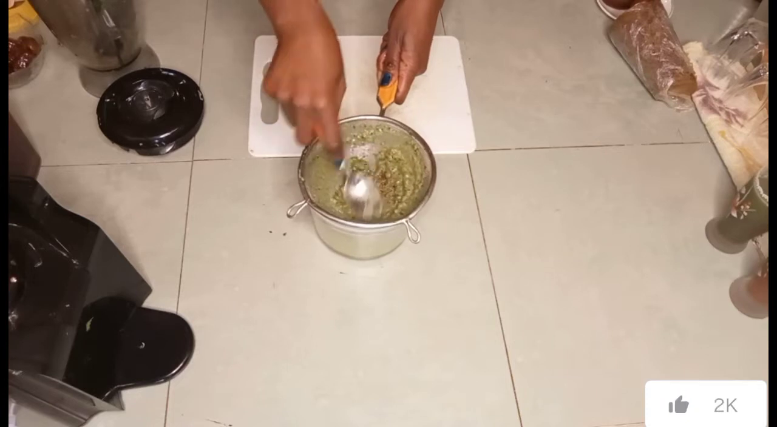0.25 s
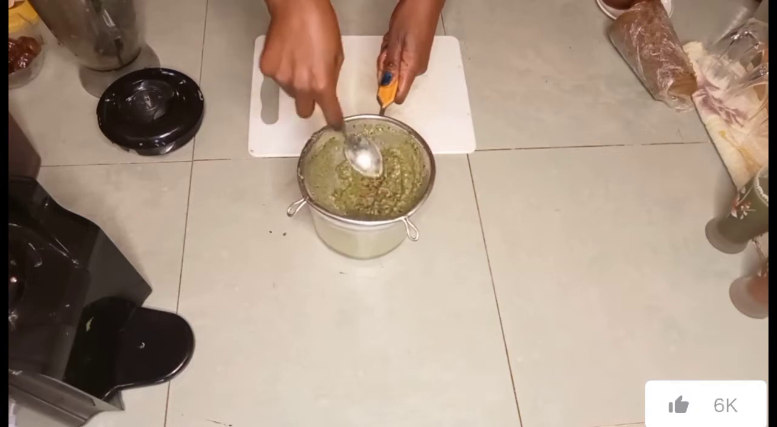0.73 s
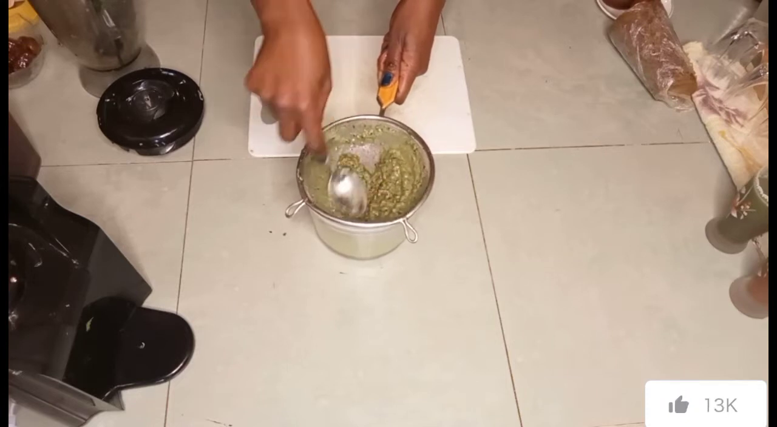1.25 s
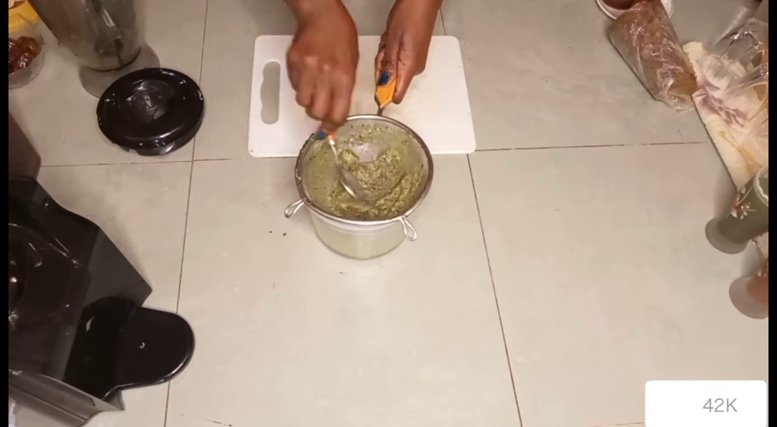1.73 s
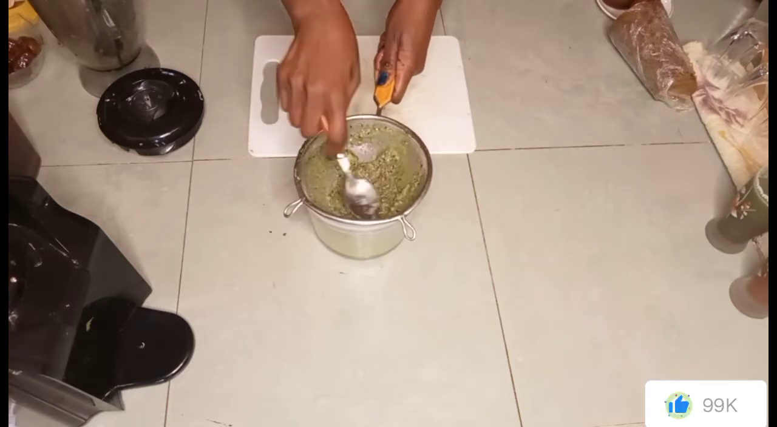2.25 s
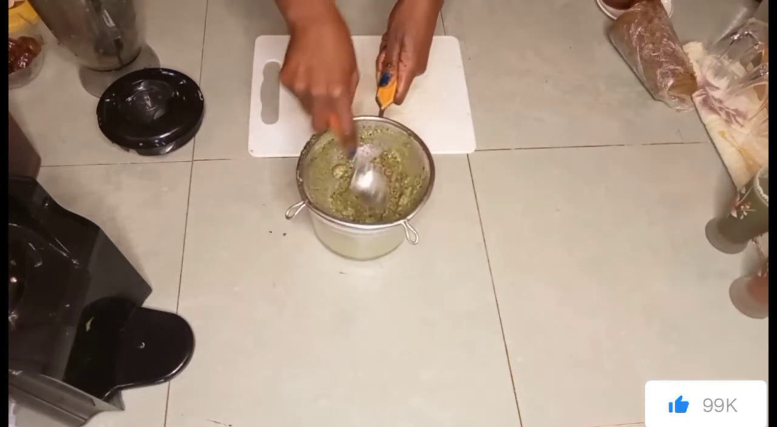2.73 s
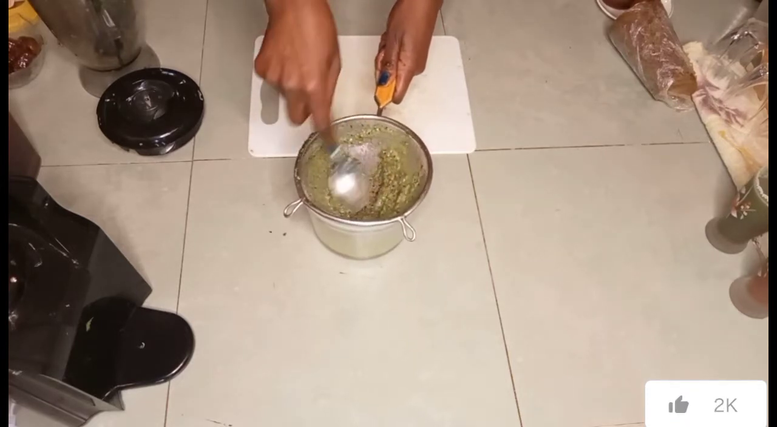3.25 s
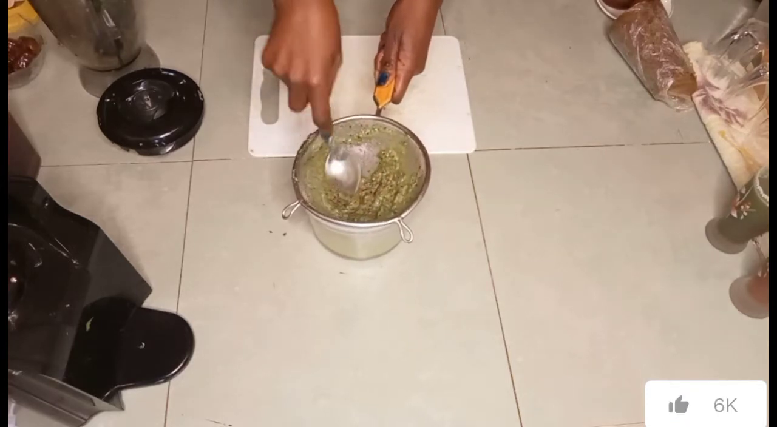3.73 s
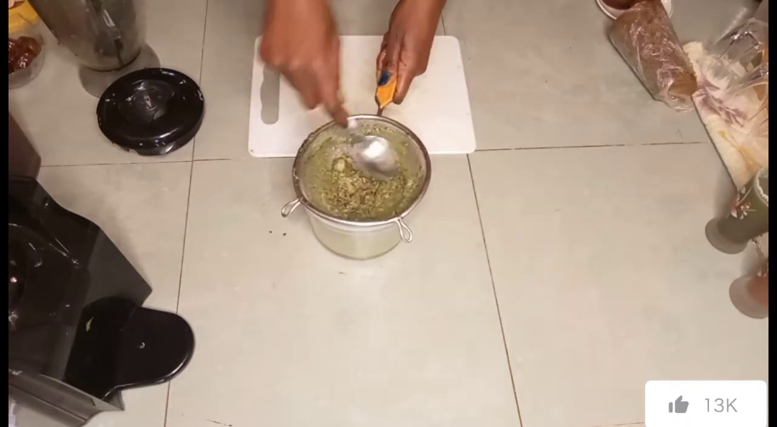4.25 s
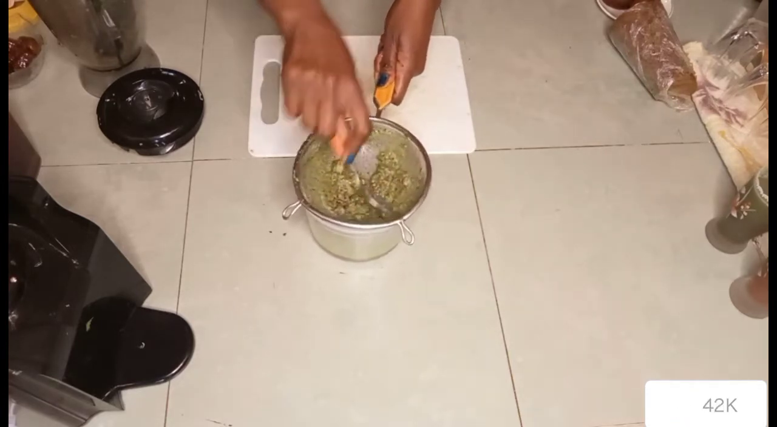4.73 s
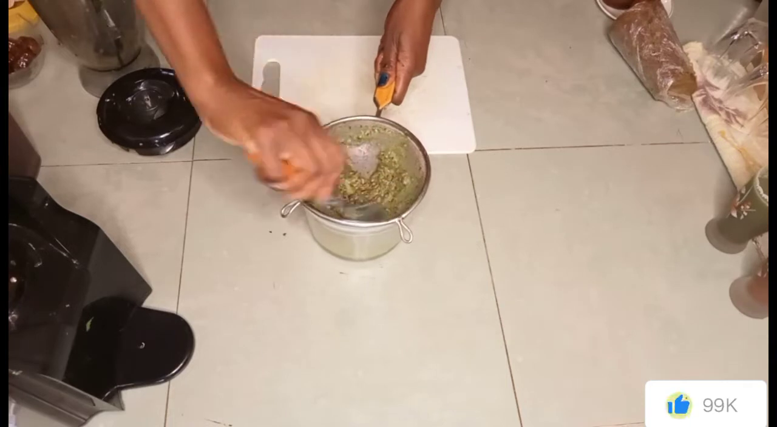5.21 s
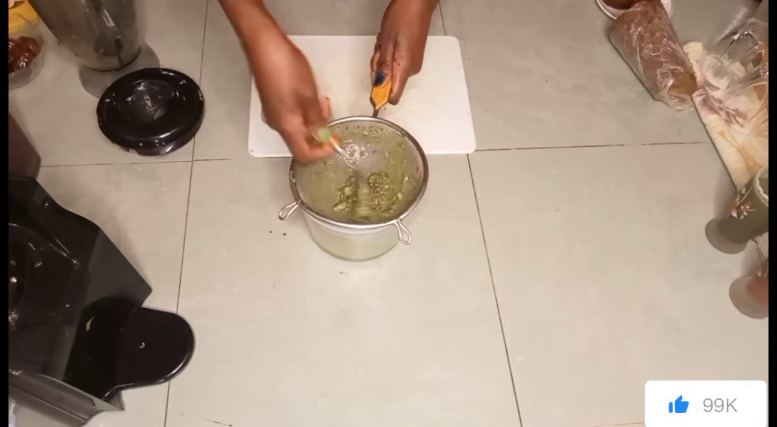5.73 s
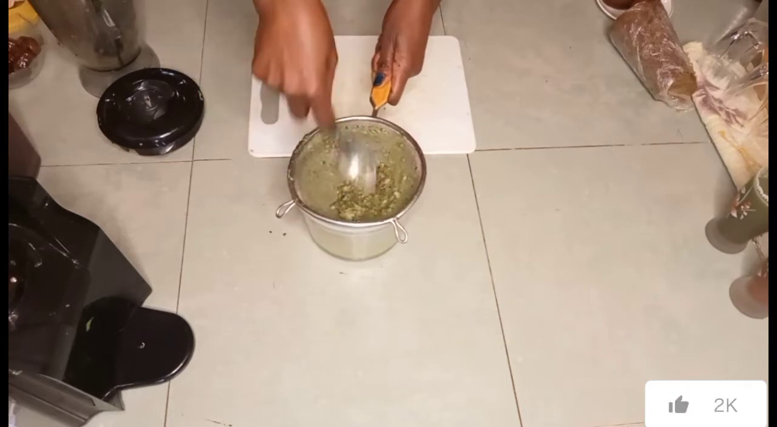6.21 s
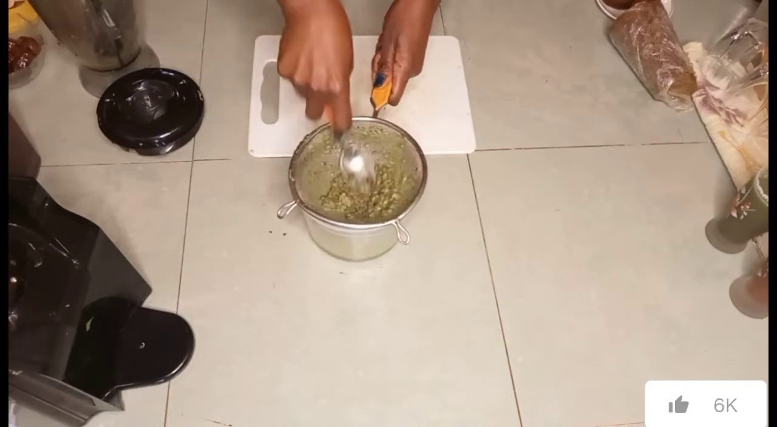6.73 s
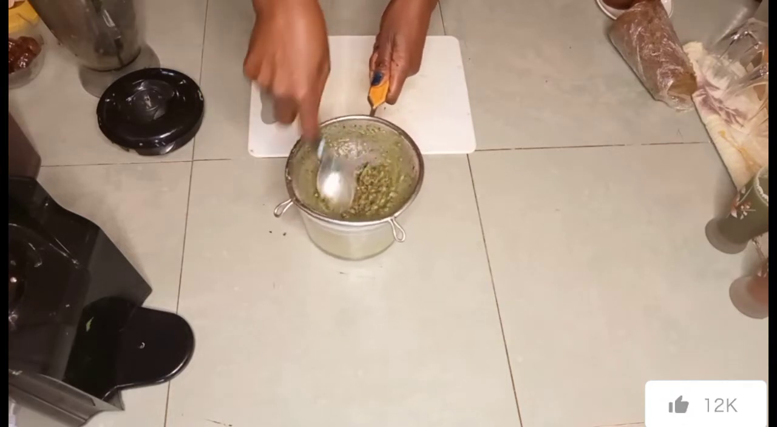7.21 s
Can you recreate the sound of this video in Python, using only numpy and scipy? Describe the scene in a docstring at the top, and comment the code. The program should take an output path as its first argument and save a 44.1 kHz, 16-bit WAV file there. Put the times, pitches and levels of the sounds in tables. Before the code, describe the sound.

Close up, a steel spoon scrapes wet pulp across a wire sieve in quick separate rasps, some ringing briefly with rough squeaky tones. The jug beneath thumps softly on the counter. Midway the strokes thin out and a longer grind circles the mesh, then lighter taps and scrapes follow, ending in a strong rasp. Small hard kitchen, low hum.

```python
"""A steel spoon rubs pulp through a wire sieve that rests on a jug, close to the microphone.
Its edge clicks over the wires amid hissing pulp, and sings in brief tones where it crosses them evenly.
Noise bursts tap mesh and rim, faint ticks drip, and ringing modes thump the jug on the kitchen counter.
Sieve and spoon ring with resonances; a small hard kitchen answers in decaying noise over a quiet hum."""
import sys
import numpy as np
from scipy import signal
from scipy.fft import rfft, irfft, next_fast_len
from scipy.io import wavfile
from scipy.ndimage import uniform_filter1d, map_coordinates

SR = 44100
rng = np.random.default_rng(int(sys.argv[2]) if len(sys.argv) > 2 else 0)


def wav_out(sig):
    """Save sig, one row per channel (or a flat mono array), as 16-bit PCM at SR to the path in sys.argv[1]."""
    wavfile.write(sys.argv[1], SR, np.round(np.clip(np.atleast_2d(sig).T, -1, 1) * 32767).astype(np.int16))


def rack_gain(trim_db):
    """Turn a fader trim in dB into the linear factor to multiply a signal by."""
    fader = np.asarray(trim_db, float)
    return 10 ** (fader / 20)


N = 329427
T = np.arange(N) / SR

# spectrum of the kitchen's air, relative: (frequency [Hz], level [dB per Hz])
AIR_SPECTRUM = [(18, -47), (32, -23.5), (60, -4), (110, 1.5), (190, -3.5), (280, -0.5), (570, -11.5),
                (1160, -15.5), (1860, -20), (3100, -19), (5000, -37.5), (7300, -29.5), (10000, -42),
                (15500, -40.5)]
# how long the room's answer lasts: (frequency [Hz], time to fall 60 dB [s])
KITCHEN_DECAY = [(200, 0.31), (1000, 0.39), (3000, 0.13), (8000, 0.19), (15000, 0.15)]
# low modes of the counter: (frequency [Hz], relative level [dB], time to fall 60 dB [s])
COUNTER_MODES = [(84, 5, .4), (95, 12, .3), (112, 3, .2)]
# upper modes of the jug: (frequency [Hz], relative level [dB], time to fall 60 dB [s])
JUG_MODES = [(150, 1, .2), (235, -3, .16)]
# the jug bumps on the counter: (time [s], relative level [dB])
THUMPS = [(0.009, -34), (0.087, -32.5), (0.366, -37), (0.427, -33), (0.73, -35), (0.783, -38),
          (1.079, -37.5), (1.271, -45), (1.398, -37.5), (1.683, -42), (1.958, -44), (2.426, -47),
          (2.513, -40), (2.757, -36), (2.821, -36), (2.865, -33), (3.069, -42.5), (3.164, -32),
          (3.386, -42), (3.46, -37.5), (3.544, -38.5), (3.687, -41.5), (3.783, -34), (4.701, -43),
          (4.893, -50), (5.439, -41.5), (6.082, -44), (6.14, -39), (6.19, -32), (6.4, -42), (6.48, -33),
          (6.726, -43), (6.766, -38.5), (6.8, -37.5), (7.012, -36), (7.08, -34), (7.118, -35.5),
          (7.367, -31), (7.409, -48)]
# wet pulp lets go of the wires: (time [s], relative level [dB])
DRIPS = [(.6025, -50), (.8604, -56), (2.6469, -57), (2.961, -54), (2.988, -54), (3.2919, -58), (5.053, -64),
         (5.1991, -57), (5.225, -52), (6.0437, -46), (7.1756, -54), (7.2479, -58)]
# spoon on mesh and rim: (time [s], relative level [dB], low knock above it [dB])
TAPS = [(0.0884, -21, -41), (0.2823, -38, -15), (0.2937, -20, -20), (0.4213, -11.5, -3), (0.7746, -25, -24),
        (1.641, -21.5, -7), (2.7184, -38, -9), (2.7731, -19, -12), (3.1649, -22.5, 6), (3.4067, -22, -4),
        (3.5174, -27, -22), (3.709, -44, -19), (3.7738, -28.5, 8), (3.823, -35, -12), (3.9781, -30.5, 3),
        (4.415, -29.5, 8), (4.7526, -33, 3), (5.1557, -40, -6), (6.0566, -20.5, -20), (6.137, -29.5, 8),
        (6.191, -30, 2), (6.35, -30, -1), (6.4035, -36, -3), (6.4777, -21.5, 8), (6.7231, -27, -40),
        (6.7946, -23.5, 2.5), (7.009, -26, -14), (7.04, -23.5, -3), (7.0715, -20, 10), (7.2638, -41.5, 0.5),
        (7.337, -23, 5.5)]
# bright spectrum of steel on wire: (frequency [Hz], relative level [dB per Hz])
RASP_SPECTRUM = [(760, -26), (1300, -6), (1620, -5), (1830, -4), (3300, -1), (4940, -23.5), (6070, -19.5),
                 (7090, -6), (9670, -23.5), (12500, -25), (15400, -27.5)]
# duller spectrum of the low body: (frequency [Hz], relative level [dB per Hz])
BODY_SPECTRUM = [(88, -50), (150, -24), (331, -9), (478, -5.5), (624, -10), (776, -6), (1600, -20.5),
                 (2080, -41.5), (3520, -120)]
# what the sieve's rim and the spoon ring with: (frequency [Hz], width [Hz], level [dB])
RIM_MODES = [(495, 12, -2), (770, 12, -11), (805, 24, -7), (1005, 20, -8), (1145, 9, -2), (1440, 12, -5),
             (1480, 10, -2), (1556, 9, -8), (1585, 14, -7), (1960, 20, -11), (2385, 8, -4), (2780, 30, -6),
             (2960, 30, -6), (3110, 14, -5), (3320, 30, -6)]
# even wire crossings: (start [s], end [s], wires a second at start [Hz], at end [Hz],
# relative level [dB], octave against the fundamental [dB])
SINGING = [(.315, 0.362, 1240, 1440, -22.5, -16), (.315, .347, 3450, 3000, -25, -40),
           (4.048, 4.082, 3550, 3150, -27, -40), (4.098, 4.128, 2700, 2820, -21, -40),
           (4.476, 4.49, 2300, 2400, -22, -40), (5.685, 5.71, 2650, 2680, -25, -40),
           (1.685, 1.717, 330, 480, -29, 1), (1.711, 1.73, 710, 900, -14.5, -32),
           (1.736, 1.751, 780, 790, -20, -28), (1.76, 1.793, 800, 680, -29.5, 1),
           (1.999, 2.037, 240, 980, -29, -10), (2.026, 2.08, 805, 760, -24, 0.5),
           (2.312, 2.351, 484, 456, -29, -19), (2.433, 2.46, 2640, 2660, -26.5, -31),
           (2.45, 2.501, 1210, 1170, -28.5, -19), (3.995, 4.033, 374, 300, -31.5, -27),
           (4.049, 4.09, 1390, 1180, -20.5, -11), (4.03, 4.06, 620, 750, -28, -10),
           (4.19, 4.235, 470, 450, -38, -30), (4.07, 4.103, 480, 420, -27, 1.5),
           (4.146, 4.185, 500, 470, -27.5, -42), (4.425, 4.487, 480, 540, -26, -7),
           (4.472, 4.509, 710, 950, -25, -13), (4.521, 4.536, 1120, 1400, -27, 3.5),
           (4.816, 4.843, 920, 800, -31.5, -41), (5.37, 5.42, 490, 427, -31, 1.5),
           (5.503, 5.544, 1580, 930, -23.5, -13.5), (5.67, 5.711, 1170, 1120, -24, -3),
           (5.764, 5.81, 1200, 1200, -25, -16), (.642, .678, 880, 1100, -30, -8),
           (.965, 1.02, 800, 980, -31, -10), (1.29, 1.325, 1080, 1200, -27, -8),
           (5.985, 6.04, 510, 500, -55, -30), (6.403, 6.43, 390, 420, -33, -20)]
# pushes over the mesh: (start [s], peak [s], relative rasp level at the peak [dB], fade [dB/s],
# low body above the rasp [dB])
PUSHES = [(0, -0, -18.5, 497, -2), (0.014, 0.04, -32, 250, 7.5), (0.074, 0.093, -39, 270, 12),
          (.279, 0.283, -40, 100, 4.5), (0.313, .316, -19.5, 300, -6), (0.314, 0.334, -20, 327, -3),
          (.37, 0.427, -42.5, 235, 11), (0.616, 0.625, -39.5, 144, 9.5), (0.641, 0.651, -26, 300, -4),
          (0.645, 0.658, -26, 502, 4.5), (0.758, 0.769, -45, 224, 9.5), (.951, .955, -31.5, 185, 2),
          (.952, 1.008, -23.5, 796, 1.5), (1.255, 1.264, -59.5, 100, 7), (1.28, 1.283, -29, 187, 1.5),
          (1.279, 1.307, -17.5, 661, -27), (1.36, 1.373, -43.5, 250, 9), (1.639, 1.644, -36, 393, 7.5),
          (1.681, 1.714, -20, 400, -2), (1.738, 1.761, -24.5, 373, -6), (1.959, 1.961, -32.5, 800, 3),
          (1.968, 2.01, -29, 215, 3.5), (1.995, 2.04, -20, 301, -4), (2.31, 2.318, -33.5, 120, 4.5),
          (2.405, 2.422, -27.5, 178, 0.5), (2.412, 2.455, -23, 340, -4.5), (2.716, 2.724, -46, 463, 11.5),
          (2.757, 2.774, -22.5, 480, 1), (2.784, 2.828, -33, 206, 7), (2.834, 2.879, -33.5, 421, 7),
          (3.049, 3.048, -37.5, 598, 2), (3.083, 3.086, -33.5, 152, -3), (3.084, 3.101, -37.5, 300, 9),
          (3.167, 3.167, -37, 600, 12), (3.365, 3.372, -53.5, 200, 8), (3.402, 3.403, -40, 207, 3.5),
          (3.405, 3.419, -39, 500, -1), (3.516, 3.516, -45, 212, 12), (3.52, 3.538, -44.5, 399, 11),
          (3.674, 3.677, -43.5, 900, 5), (3.707, 3.71, -39.5, 300, -2), (3.712, 3.726, -38.5, 350, 2),
          (3.765, 3.778, -45.5, 215, 8.5), (3.977, 3.979, -36.5, 104, 0), (3.98, 4.017, -39.5, 146, 10),
          (4.01, 4.06, -21.5, 186, 0.5), (4.054, 4.115, -17.5, 290, -3.5), (4.404, 4.413, -25.5, 212, -1.5),
          (4.423, 4.491, -18.5, 202, -21), (4.487, 4.54, -30, 240, 9.5), (4.755, 4.754, -44.5, 767.5, 8.5),
          (4.811, 4.813, -30, 215, -1), (4.811, 4.837, -23.5, 393, -1.5), (5.751, 5.792, -25.5, 683.5, 4),
          (6.047, 6.053, -36, 196, 5.5), (6.051, 6.073, -31, 600, -2.5), (6.066, 6.094, -29, 284, 1),
          (6.349, 6.36, -48.5, 174, 6), (6.388, 6.401, -29, 267, -3), (6.437, 6.472, -43, 182, 10),
          (6.721, 6.723, -31, 300, 8), (6.735, 6.737, -38, 300, 2), (6.794, 6.794, -43, 184, 7),
          (7.004, 7.009, -36.5, 275, 0.5), (7.058, 7.079, -37, 766, 5), (7.1, 7.113, -44.5, 197, 7),
          (7.328, 7.33, -32.5, 600, 2.5), (7.363, 7.371, -26.5, 100, 4.5), (7.372, 7.417, -17, 128, -5)]
# one long grind round the sieve: (time [s], relative rasp level [dB], low body above it [dB])
GRIND = [(5.151, -73.5, 4), (5.2, -64.5, 11), (5.261, -32.5, 3.5), (5.326, -28, -6), (5.382, -30, -2),
         (5.42, -25.5, -1.5), (5.45, -18, -11.5), (5.53, -17.5, -12.5), (5.55, -23, -7), (5.591, -25.5, -1),
         (5.713, -19.5, -0.5), (5.732, -36, 12.5), (5.78, -40, 2)]


def unit(x):
    """Scales a signal to rms 1."""
    return x / np.sqrt(np.mean(x ** 2) + 1e-20)


def along(points, hz):
    """Reads (frequency [Hz], value) points on a log frequency axis."""
    f, value = np.transpose(points)
    return np.interp(np.log(hz + 1), np.log(f + 1), value)


def wobble(rate):
    """A smooth random curve through rate knots a second."""
    return map_coordinates(rng.standard_normal(int(N * rate / SR) + 4), [T * rate])


def filtered(x, response):
    """Multiplies the spectrum of x by a complex response of frequency."""
    size = next_fast_len(N + SR // 2)
    return irfft(rfft(x, size) * response(np.fft.rfftfreq(size, 1 / SR)), size)[:N]


def low_cut(x, corner_hz, order):
    """First-order low cuts in a row: the deep bass falls away below the corner."""
    return filtered(x, lambda hz: (1j * hz / (corner_hz + 1j * hz)) ** order)


def coloured(x, spectrum):
    """A causal (minimum-phase) filter with the given spectrum, so that clicks keep their sharp start."""
    size = 4096
    gain = rack_gain(along(spectrum, np.fft.rfftfreq(size, 1 / SR)))
    cepstrum = irfft(np.log(gain + 1e-6))
    # folding the cepstrum forward in time makes the filter causal
    cepstrum[1:size // 2] *= 2
    cepstrum[size // 2 + 1:] = 0
    impulse = irfft(np.exp(rfft(cepstrum)))
    return signal.fftconvolve(x, impulse)[:N]


def hum():
    """The quiet of the kitchen: noise as air, and an appliance's fuzzy drone as a narrow noise band."""
    noise = filtered(rng.standard_normal(N), lambda hz: rack_gain(along(AIR_SPECTRUM, hz)))
    band = filtered(rng.standard_normal(N), lambda hz: np.exp(-((hz - 235) / 18) ** 2))
    air_db = -60.5 + 0.9 * wobble(3)
    drone_db = -65.5 + 6.7 * np.tanh(wobble(6))
    return rack_gain(air_db) * unit(noise) + rack_gain(drone_db) * unit(band)


def kitchen(x):
    """Each frequency of the room's answer dies at its own speed; the tail is new as the hand moves."""
    out = np.zeros(N + 2 * SR)
    step, delay = SR // 4, 200  # samples: a new tail every quarter second, 4.5 ms behind the sieve
    for start in range(0, N, step):
        hz, t, noise = signal.stft(rng.standard_normal(SR // 2), SR, nperseg=256)
        decay_db = -60 * t / along(KITCHEN_DECAY, hz)[:, None]
        tail = signal.istft(noise * rack_gain(decay_db), SR, nperseg=256)[1]
        wet = signal.fftconvolve(x[start:start + step], tail / np.linalg.norm(tail))
        out[start + delay:][:len(wet)] += wet
    return out[:N]


def thumps():
    """Decaying sines: the counter top rings low and soft, the jug knocks briefly above it."""
    out, t = np.zeros(N + SR), np.arange(SR // 2) / SR
    swell = 1 - np.exp(-t / 0.005)  # a push, not a blow
    for s, db in THUMPS:
        seat = 1 + 0.02 * rng.standard_normal(5)  # the jug sits differently each time
        ring = np.zeros(len(t))
        for (hz, mode_db, t60), detune in zip(COUNTER_MODES + JUG_MODES, seat):
            ring += rack_gain(mode_db - 60 * t / t60) * np.sin(2 * np.pi * hz * detune * t)
        out[round(s * SR):][:len(t)] += rack_gain(db) * ring * swell
    return low_cut(out[:N], 75, order=4)


def drips():
    """Each drip is a faint bright tick of noise that falls 60 dB in 12 ms."""
    ticks, t = np.zeros(N + SR), np.arange(SR // 50) / SR
    for s, db in DRIPS:
        ticks[round(s * SR):][:len(t)] += rack_gain(db - 60 * t / 0.012) * rng.standard_normal(len(t))
    return coloured(ticks[:N], [(1500, -14), (4000, -8), (7500, 0), (15000, -16)])


def taps():
    """Each tap is a short crack of noise with a duller, longer knock under it."""
    crack, knock = np.zeros(N + SR), np.zeros(N + SR)
    t = np.arange(SR // 8) / SR
    onset = (1 - np.exp(-t / 0.0003)) * (1 + 1.2 * np.exp(-t / 0.001))
    for s, db, knock_db in TAPS:
        burst = rng.standard_normal((2, len(t))) * onset
        crack[round(s * SR):][:len(t)] += rack_gain(db - 60 * t / 0.032) * burst[0]
        knock[round(s * SR):][:len(t)] += rack_gain(db + knock_db - 60 * t / 0.055) * burst[1]
    return rack_gain(4.5) * coloured(crack[:N], RASP_SPECTRUM) + rack_gain(9) * coloured(knock[:N], BODY_SPECTRUM)


def rim(x):
    """The direct sound plus the ringing of rim and spoon, one resonance per mode."""
    def response(f):
        ringing = 0
        for centre, width, db in RIM_MODES:
            ringing = ringing + rack_gain(db) * 1j * f * width / (centre ** 2 - f ** 2 + 1j * f * width)
        return 1 + ringing
    return filtered(x, response)


def singing():
    """Even wire crossings fuse into a short rough tone with a stack of overtones."""
    out = np.zeros(N)
    rough_hz, shaky = 12 * wobble(120), rack_gain(1.8 * wobble(150))
    for start, end, first, last, db, octave_db in SINGING:
        now = (T > start) & (T < end)
        u = (T[now] - start) / (end - start)
        crossing_hz = first + (last - first) * u + rough_hz[now]
        phase = 2 * np.pi * np.cumsum(crossing_hz) / SR
        tone = np.sin(phase) + rack_gain(octave_db) * np.sin(2 * phase)
        for k in range(3, 9):
            if k * last < 3800:
                # the third partial follows half the octave's dB, each higher one loses 2.5 dB
                partial_db = -8 + octave_db / 2 - 2.5 * (k - 3)
                tone += rack_gain(partial_db) * np.sin(k * phase + k * k)
        out[now] += rack_gain(db) * np.sin(np.pi * u) ** 0.95 * tone
    return out * shaky


def wires(per_s, scatter, size_db, smear):
    """One click per wire crossed, at an uneven hand speed, over the hiss of pulp being sheared."""
    speed = per_s * np.exp(0.25 * wobble(25))
    crossed = np.cumsum(speed / SR + scatter * rng.standard_normal(N))
    clicks = np.diff(np.floor(np.maximum.accumulate(crossed)), prepend=0)
    clicks = clicks * rack_gain(size_db * rng.standard_normal(N))
    hiss = rng.standard_normal(N)
    return np.sqrt(1 - smear) * unit(clicks - clicks.mean()) + np.sqrt(smear) * hiss


def shifting(x, depth_db):
    """The mesh's resonances move with the point of contact: narrow bands swell for some 30 ms each."""
    z = signal.stft(x, nperseg=512)[2]
    field = uniform_filter1d(rng.standard_normal(z.shape), size=2, axis=0)
    field = uniform_filter1d(field, size=5, axis=1)
    fading = 1 / (1 + (np.linspace(0, SR / 2, len(z)) / 6500) ** 2)  # the treble stays a smooth hiss
    swell_db = depth_db * np.clip(unit(field), -2, 1.6) * fading[:, None]
    return signal.istft(z * rack_gain(swell_db), nperseg=512)[1][:N]


def grit(per_s):
    """Seeds and fibres catch and let go: ticks of about a millisecond lift the contact level a little."""
    catches = (rng.random(N) < per_s / SR) * rng.uniform(0.1, 0.5, N)
    return 1 + signal.lfilter([1], [1, -np.exp(-1 / (0.001 * SR))], catches)


def pressure():
    """Gains of rasp and body: every push rises, peaks, fades and drags on; the grind follows its curve."""
    rise_db, rounding = 21, 0.16  # climb over the rise time, cut by rounding the top over this share of it
    drag_db, drag_db_per_s = -12, 222  # the spoon drags on lightly after each peak
    body_follows = 0.93  # the low body swells and fades by only this share of the rasp's dB
    rasp_power, body_power = np.zeros(N), np.zeros(N)
    for start, peak, db, fade, body_db in PUSHES:
        now = slice(round(start * SR), round((peak + 0.5) * SR))
        rise = max(peak - start, 1e-3)
        away = np.hypot(T[now] - peak, rounding * rise) - rounding * rise  # rounded time from the peak
        fade_power = rack_gain(-2 * fade * away)
        drag_power = rack_gain(2 * (drag_db - drag_db_per_s * away))
        fall_db = 10 * np.log10(fade_power + drag_power)
        shape_db = np.where(T[now] < peak, -rise_db * away / rise, fall_db)
        rasp_power[now] += rack_gain(2 * (db + shape_db))
        body_power[now] += rack_gain(2 * (db + body_db + body_follows * shape_db))
    s, level, low = np.transpose(GRIND)
    now = (T >= s[0]) & (T <= s[-1])
    rasp_power[now] += rack_gain(2 * np.interp(T[now], s, level))
    body_power[now] += rack_gain(2 * np.interp(T[now], s, level + low))
    return np.sqrt(rasp_power), np.sqrt(body_power)


def scrape():
    """Rasp and body are two colourings of one contact; pressure flutters quickly under the stroke."""
    rasp_gain, body_gain = pressure()
    flutter_db = np.tanh(wobble(45)) + 1.3 * np.tanh(wobble(260))
    crossings = wires(1100, scatter=0.04, size_db=2.0, smear=0.7)
    contact = shifting(crossings, depth_db=5.0) * grit(300)
    rasp = unit(coloured(contact, RASP_SPECTRUM)) * rasp_gain * rack_gain(flutter_db - 2.91)
    body_db = flutter_db + 0.99 * wobble(30) - 7.0
    body = unit(coloured(contact, BODY_SPECTRUM)) * body_gain * rack_gain(body_db)
    return low_cut(rasp + body, 60, order=2)


def scene():
    """The sieve near the microphone, the room's answer to it, the thumping counter and the hum."""
    sieve = rim(scrape() + taps() + drips() + singing())
    room = rack_gain(-15.0) * kitchen(sieve)
    return (sieve + room + thumps() + hum())[None]


def band_limit(x):
    """A steep low-pass at the top of the band."""
    return signal.sosfilt(signal.butter(12, 16630, fs=SR, output="sos"), x)


def record(dry):
    """The microphone's response peaks just below its top, then drops away steeply."""
    def capsule(hz):
        peak = rack_gain(5 * np.exp(-((hz - 15300) / 1300) ** 2))
        return peak / (1 + (hz / 15620) ** 160)
    mix = filtered(dry[0], capsule)[None]
    return band_limit(mix)


dry = scene()
out = record(dry)
wav_out(out)
```